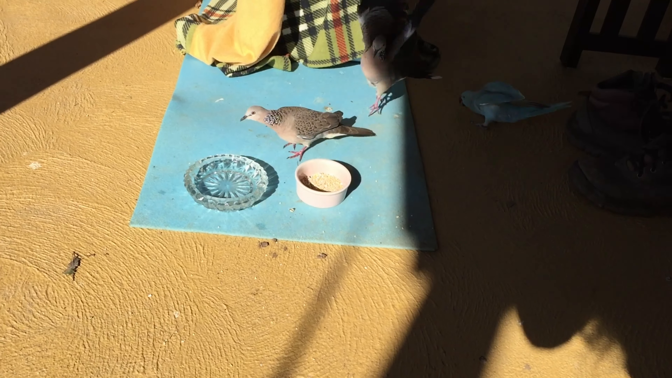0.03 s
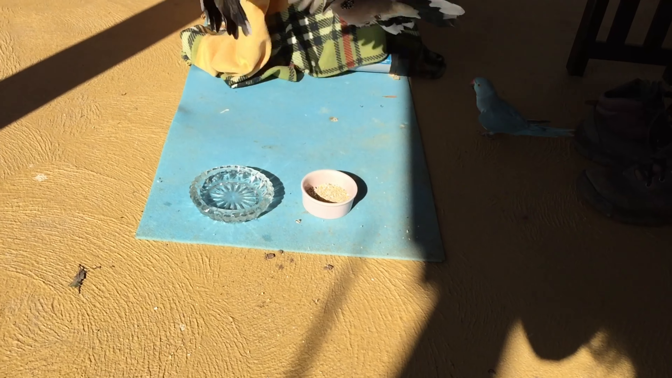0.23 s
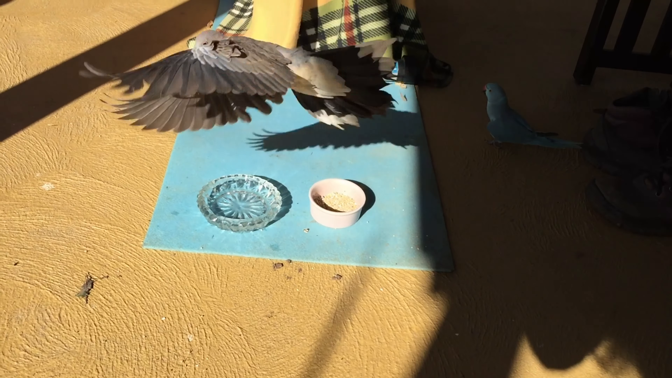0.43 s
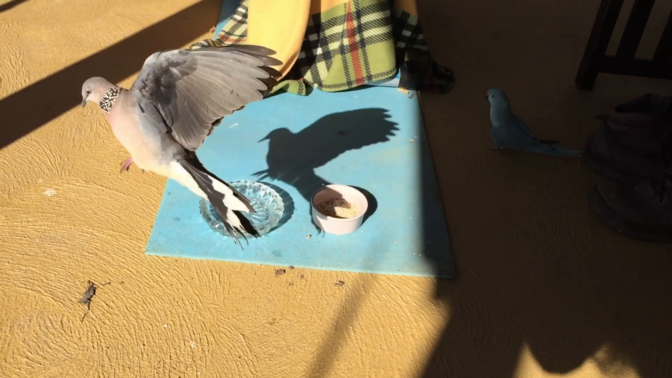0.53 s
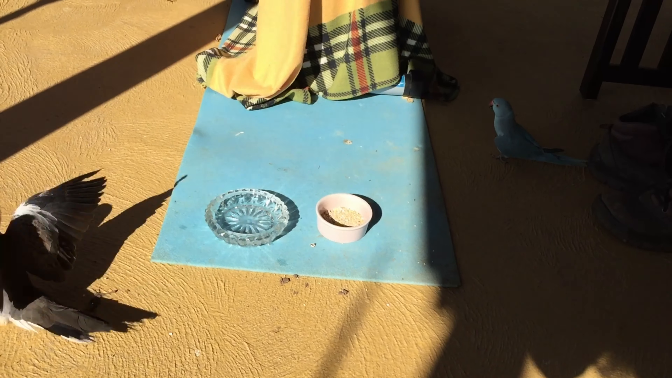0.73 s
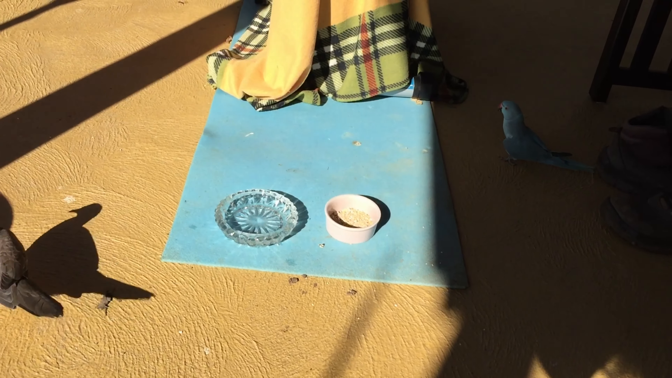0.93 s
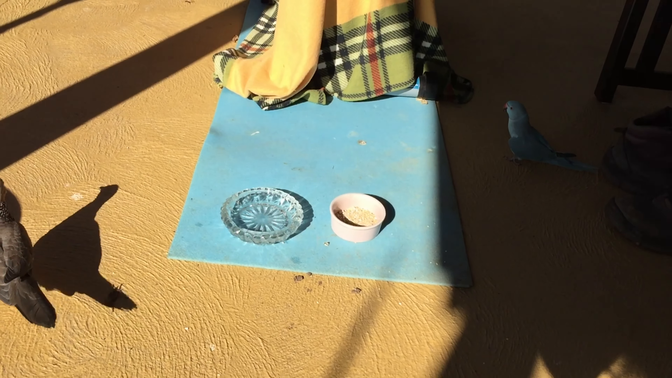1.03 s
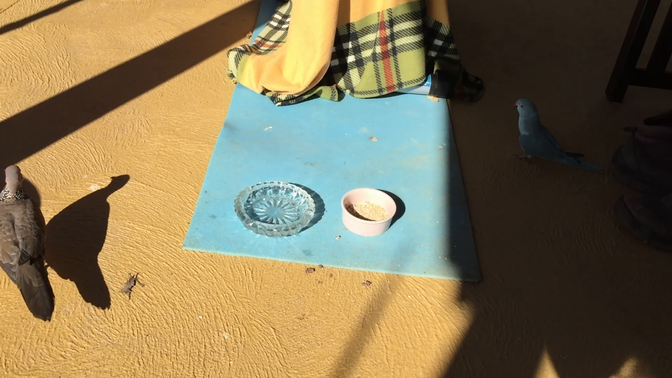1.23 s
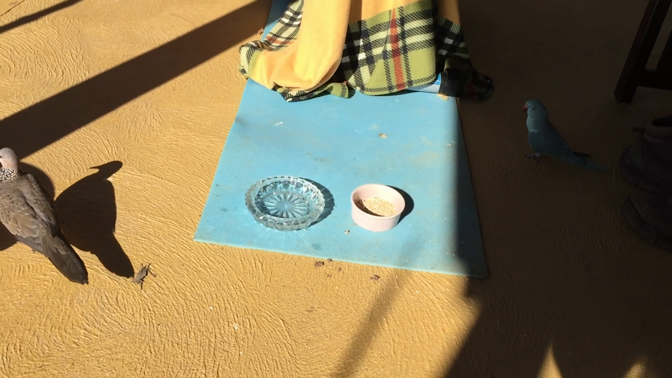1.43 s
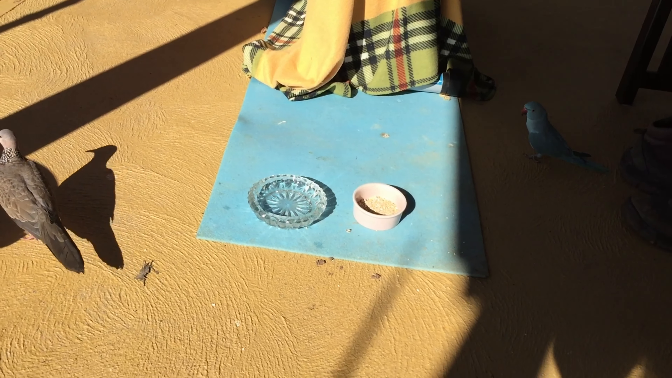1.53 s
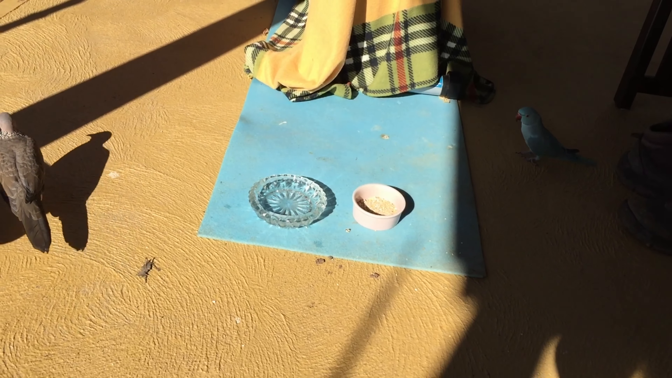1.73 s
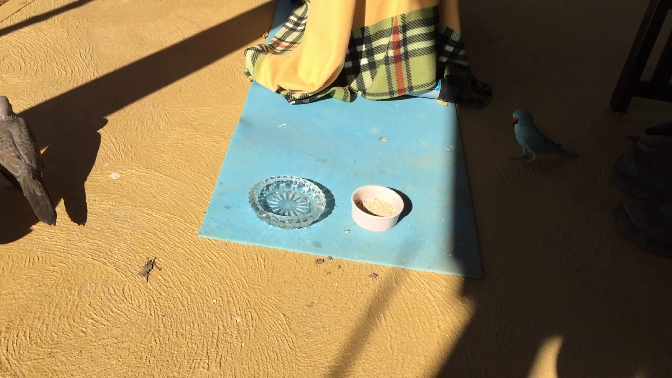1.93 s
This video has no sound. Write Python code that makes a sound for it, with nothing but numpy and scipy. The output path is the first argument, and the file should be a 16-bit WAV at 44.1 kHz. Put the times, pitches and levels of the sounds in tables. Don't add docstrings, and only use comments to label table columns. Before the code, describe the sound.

A dove's wings flap hard and close, with a sharp clap, breathy whooshes and tiny feather whistles, then it lands with faint rustles and claw ticks on a walled patio over low distant traffic; small camera microphone.

```python
import sys
import numpy as np
from scipy import signal
from scipy.fft import rfft, irfft
from scipy.io import wavfile
from scipy.ndimage import uniform_filter1d

SR = 44100
rng = np.random.default_rng(int(sys.argv[2]) if len(sys.argv) > 2 else 0)


def to_linear_factor(level_db):
    exponent = np.asarray(level_db, float) / 20
    return 10 ** exponent


def output_pcm(signal):
    pcm = np.clip(np.atleast_2d(signal).T, -1, 1) * 32767
    wavfile.write(sys.argv[1], SR, np.round(pcm).astype(np.int16))


N = 88200

# peak t/s, rise/s, fall T60/s, level/dB, brightness/(dB per octave)
STROKES = [(.165, 0.0087, 0.26, -44, 3), (.189, .006, 0.25, -36, 1.5), (.245, 0.0053, 0.11, -30.5, -0.5),
           (.261, .012, .11, -24.5, 2), (.272, .008, 0.095, -27, -1.5), (.305, 0.015, 0.2, -38, 2),
           (.353, .009, 0.12, -24, 2.5), (.368, .003, 0.15, -27, 1), (.434, .01, 0.095, -32, 2),
           (.475, .01, 0.093, -43, 4), (.56, .015, 0.34, -39, 1), (.597, 0.0081, 0.14, -40, 0.5),
           (.705, .008, 0.2, -48.5, 5), (.835, 0.016, 0.13, -41.5, 1.5), (1.06, .015, 0.29, -49.5, -2),
           (1.175, .02, 0.33, -48.5, -1), (1.276, 0.0038, 0.21, -37.5, -4.5),
           (1.99, 0.016, 0.11, -52.5, -5)]
# f/Hz, level/(dB per Hz)
FEATHER_SPECTRUM = [(88, -56), (150, -4), (414, -8), (448, -9), (545, -9), (1040, -5.5), (2500, -13),
                    (12400, -22), (16000, -35)]
# t/s, level/dB
SNAPS = [
    (.3304, -7),
    (.3312, -5),
    (.3325, -6.5),
    (.3335, -9),
    (.3346, -8),
    (.3366, -13),
    (.3664, -12),
]
# f/Hz, width/Hz, level/dB
QUILL_MODES = [(1680, 560, -1.5), (3500, 900, 1), (5400, 800, 0), (8450, 1030, 5), (12500, 2500, 6)]
# start t/s, length/s, level/dB, f/Hz
WHISTLES = [(.243, .005, -29, 1900), (0.252, .009, -28, 1550), (.2685, .008, -20, 1200),
            (.2635, .005, -21, 1050), (.2645, .004, -27, 2000), (0.302, 0.0076, -30, 915),
            (.334, 0.006, -27, 1000), (.340, 0.016, -24.5, 2430), (.331, .006, -20, 1500),
            (.350, 0.009, -21, 1600), (.4255, .013, -19, 1270), (.336, .009, -24.5, 660),
            (.498, 0.009, -37, 1240), (1.274, .012, -41, 1050), (.468, .012, -39, 1200),
            (.449, .013, -35, 880), (.450, 0.010, -33, 1250), (.431, .008, -37, 2200),
            (1.052, 0.0194, -51, 1830), (1.161, .025, -49.5, 1300), (1.795, .014, -50, 2150),
            (.186, 0.0083, -37.5, 1140), (.437, .009, -29, 1080), (.421, .006, -30, 850),
            (.508, .012, -43, 1230), (1.797, .012, -54, 1860), (.340, .006, -24, 1350)]
# t/s, level/dB, f/Hz
PUSHES = [(.246, -25, 112), (0.264, -16, 383), (0.281, -24.5, 59.4), (0.298, -37, 200), (.342, -33, 149),
          (.3675, -14, 200), (0.3645, -21, 85), (0.375, -24, 68), (0.438, -28.5, 111), (.192, -28, 149),
          (1.285, -34, 160), (1.297, -33, 120), (1.31, -41, 190), (.3683, -20, 390), (.003, -40, 290),
          (.196, -34, 230), (.41, -31, 170)]
# t/s, level/dB, brightness/dB (gain of the bright spectrum, cut of the dull one)
RUSTLE = [(0, -56.5, -10.5), (.12, -54, -9.5), (.2, -44.5, 2.5), (.4, -32, -2), (.5, -42, -1),
          (.6, -44, -6), (.665, -52, -0.5), (.76, -46, -4), (.92, -51.5, -5.5), (1.2, -57.5, -13),
          (1.5, -59.5, -9.5), (2, -62, -8.5)]
# t/s, level/dB, f/Hz, width/Hz, rattle/s
TICKS = [(0.062, -40, 1850, 600, .008), (.0645, -36.5, 9200, 7000, .002), (0.137, -38, 3800, 2500, 0.0067),
         (0.1429, -27, 4470, 1540, 0.0027), (.688, -36.5, 4600, 2500, 0.0022),
         (0.986, -43.5, 2760, 1200, 0.0058), (1.1405, -37, 6800, 3500, 0.005),
         (1.242, -50, 6000, 6100, 0.01), (1.3465, -39, 8000, 1000, 0.0025),
         (1.3455, -40, 9000, 9000, 0.0025), (1.408, -49, 8500, 7000, 0.005),
         (1.3505, -44, 13500, 4000, 0.002), (1.468, -48, 4200, 3000, .006),
         (1.5315, -43, 12000, 8000, 0.0015), (1.728, -56, 11000, 8000, .004),
         (0.002, -50.5, 4100, 1500, 0.021), (.1865, -34.5, 5700, 1900, 0.0075),
         (.1875, -50, 9420, 4000, .003), (1.42, -56, 6000, 2000, 0.025), (1.475, -55, 4600, 2000, 0.01),
         (1.2693, -40, 1900, 2500, .003), (.95, -51, 7700, 6600, 0.044), (.112, -52.5, 4800, 2500, 0.0082),
         (1.356, -51, 7200, 2500, .016)]
# t/s, level/dB, f/Hz, width/Hz, rattle/s
KNOCKS = [
    (1.273, -41, 1600, 1900, 0.01),
    (1.141, -42, 1500, 2000, 0.017),
    (0.886, -43, 400, 130, 0.014),
]
# f/Hz, level/(dB per Hz)
TRAFFIC_SPECTRUM = [(15, -76), (25, -44), (48, -2), (70, 0.5), (166, -13), (229, -25), (2110, -35),
                    (3520, -49.5), (16000, -54)]
# f/Hz, width/Hz, level/dB
DRONES = [(65, 19, 0.5), (102.8, 39, -5), (165.7, 70, -16), (41, 18, -9.5)]
# centre t/s, half length/s, level/dB
DRONE_LUMPS = [(.04, .03, -46), (.11, .03, -42), (.17, .02, -45), (.28, .03, -36), (.44, .03, -38),
               (.55, .03, -40), (.625, .015, -40), (.70, .035, -39), (.77, .015, -45), (.825, .028, -41),
               (.92, .025, -41), (.98, .015, -46), (1.07, .04, -42), (1.155, .02, -40), (1.21, .02, -39),
               (1.30, .02, -40), (1.35, .025, -43), (1.40, .015, -42), (1.44, .02, -44), (1.51, .02, -47),
               (1.585, .016, -35.5), (1.65, .015, -40), (1.71, .04, -43), (1.83, .025, -42),
               (1.905, .02, -43), (1.96, .03, -46)]


def evened(x):
    return x / np.sqrt(np.mean(x ** 2) + 1e-20)


def smooth(x, size):
    return uniform_filter1d(uniform_filter1d(x, size=size), size=size)


def add(mix, s, sound):
    part = mix[max(round(s * SR), 0):][:len(sound)]
    part += sound[:len(part)]


def colour(x, points, tilt_db=0.):
    hz = np.fft.rfftfreq(len(x), 1 / SR) + 1
    f, db = np.transpose(points)
    shape_db = np.interp(np.log(hz), np.log(f), db)
    tilt = tilt_db * np.log2(np.clip(hz, 200, None) / 2000)
    return evened(irfft(rfft(x) * to_linear_factor(shape_db + tilt), len(x)))


def resonate(x, hz, width_hz):
    turn = np.exp(2j * np.pi * np.cumsum(hz * np.ones(len(x))) / SR)
    r = np.exp(-np.pi * width_hz / SR)
    return 2 * (turn * signal.lfilter([1 - r], [1, -r], x / turn)).real


def resonate_twice(x, hz, width_hz):
    return resonate(resonate(x, hz, width_hz), hz, width_hz)


def grainy(count, crackle_db, flicker_db):
    clicks, crackle, flicker = rng.standard_normal((count, 3)).T
    return clicks * to_linear_factor(crackle_db * crackle + flicker_db * evened(smooth(flicker, 90)))


def patchy(x, depth_db, size):
    z = signal.stft(x, nperseg=256, noverlap=192)[2]
    field = rng.standard_normal(z.shape[::-1]).T
    field = uniform_filter1d(field, size=4, axis=0)
    field = evened(smooth(field, size))
    return evened(signal.istft(z * to_linear_factor(depth_db * field), nperseg=256, noverlap=192)[1][:len(x)])


def stroke(peak, rise, t60, db, tilt_db):
    t = np.arange(8192) / SR - 2 * rise
    shape = np.where(t < 0, np.exp(-(t / rise) ** 2), to_linear_factor(-60 * np.maximum(t, 0) / t60))
    noise = patchy(grainy(8192, 2.4, 1.6), 4.35, size=4)
    return peak - 2 * rise, to_linear_factor(db) * shape * colour(noise, FEATHER_SPECTRUM, tilt_db)


def clap():
    out, t = np.zeros(N), np.arange(400) / SR
    for s, db in SNAPS:
        ring = 0
        for hz, width_hz, mode_db in QUILL_MODES:
            phase, detune = rng.uniform(0, 1, 2)
            tone = np.sin(2 * np.pi * (hz * (0.98 + 0.22 * detune) * t + phase))
            ring = ring + to_linear_factor(mode_db) * np.exp(-np.pi * width_hz * t) * tone
        ring = ring * (1 - np.exp(-t / .00015))
        add(out, s, to_linear_factor(db) * ring / abs(ring).max())
    add(out, *stroke(peak=.3312, rise=.0006, t60=0.056, db=-15.5, tilt_db=-0.5))
    return out


def whistle(start, length, db, hz):
    sag, fuzz = .06, .45
    noise = rng.standard_normal(4096)
    u = np.linspace(0, 1, round(length * SR))
    pitch = hz * (1 + sag * (.5 - u))
    tone = np.sin(2 * np.pi * np.cumsum(pitch) / SR)
    tone = tone + fuzz * evened(resonate_twice(noise, hz, 450))[-len(u):]
    return start, to_linear_factor(db) * np.sin(np.pi * u ** 1.04) ** .7 * tone


def push(s, db, hz):
    cycles = 1.16
    u = np.arange(round(cycles / hz * SR)) * hz / SR
    swing = np.sin(2 * np.pi * u) * np.exp(-.6 * u)
    return s, to_linear_factor(db) * np.sin(np.pi * u / cycles) * swing


def stir():
    t, noise = np.arange(N) / SR, patchy(grainy(N, 1.2, 0.83), 2.7, size=12)
    s, db, tilt = np.transpose(RUSTLE)
    db, tilt = np.interp(t, s, db), np.interp(t, s, tilt)
    dull = colour(noise, FEATHER_SPECTRUM, -1.25)
    bright = colour(noise, FEATHER_SPECTRUM, 3.2)
    rustle = (to_linear_factor(-tilt) * dull + to_linear_factor(tilt) * bright) / 2
    hollow = evened(resonate_twice(rng.standard_normal(N), hz=979, width_hz=255))
    return to_linear_factor(db - 2.0) * (rustle + to_linear_factor(-7 - tilt / 2) * hollow)


def tick(s, db, hz, width_hz, rattle):
    t, clicks = np.arange(2048) / SR, grainy(2048, 4.5, 2.5)
    shape = np.minimum(t / 0.00054, 1) * np.exp(-t / rattle)
    ring = resonate_twice(shape * clicks, hz, width_hz)
    return s, to_linear_factor(db - 3) * ring * np.linalg.norm(shape) / np.linalg.norm(ring)


def patio(x):
    t60 = 0.23
    at = np.arange(150, SR // 2, 20)
    taps = np.zeros(SR // 2 + 20)
    sign = rng.choice([-1., 1.], len(at))
    taps[at + rng.integers(0, 20, len(at))] = sign * to_linear_factor(-60 * at / SR / t60)
    taps = signal.lfilter([1], [1, -.4], taps)
    return signal.fftconvolve(x, taps / np.linalg.norm(taps))[:N]


def yard():
    wash_db, lull_db = -44.5, -58
    drones = 0
    for hz, width_hz, db in DRONES:
        drones = drones + to_linear_factor(db) * evened(resonate_twice(rng.standard_normal(N), hz, width_hz))
    drones = drones / np.sqrt(smooth(drones ** 2, 900) + .1)
    s, half, db = np.transpose(DRONE_LUMPS)[..., None]
    bumps = to_linear_factor(db) ** 2 * np.exp(-((np.arange(N) / SR - s) / half) ** 2)
    lumps = np.sqrt(to_linear_factor(lull_db) ** 2 + bumps.sum(0))
    noise = patchy(grainy(N, 0, 0.31), 0.84, size=20)
    wash = to_linear_factor(wash_db) * colour(noise, TRAFFIC_SPECTRUM)
    wash = signal.lfilter(*signal.butter(2, 130, "high", fs=SR), wash)
    return wash + lumps * drones


def scene():
    bird, air = clap(), np.zeros(N)
    for make, rows in ((stroke, STROKES), (whistle, WHISTLES), (tick, TICKS), (tick, KNOCKS)):
        for row in rows:
            add(bird, *make(*row))
    for row in PUSHES:
        add(air, *push(*row))
    echo = to_linear_factor(-13) * patio(bird)
    return (bird + echo + air + stir() + yard())[None]


def low_pass(x):
    return signal.sosfilt(signal.butter(12, 16430, fs=SR, output="sos"), x)


def record(dry):
    cut = signal.lfilter(*signal.butter(2, 42, "high", fs=SR), dry)
    cut = cut - 0.65 * resonate(cut[0], hz=10350, width_hz=650)
    band_limit = signal.firwin(767, 15900, window=("kaiser", 9), fs=SR)
    mix = signal.oaconvolve(cut, band_limit[None], "same")
    return low_pass(mix)


dry = scene()
out = record(dry)
output_pcm(out)
```